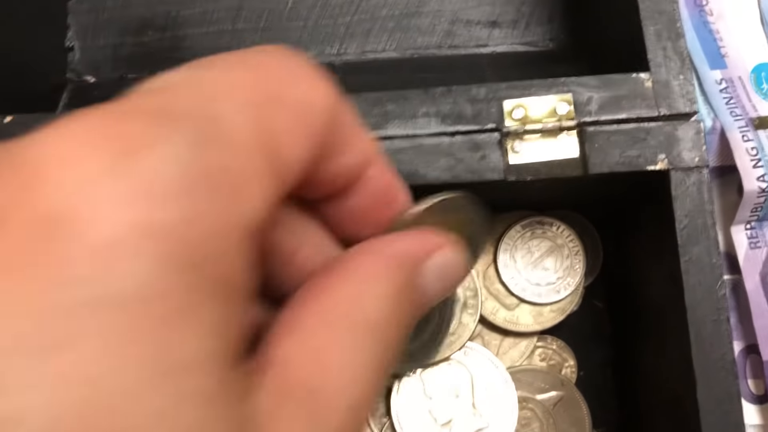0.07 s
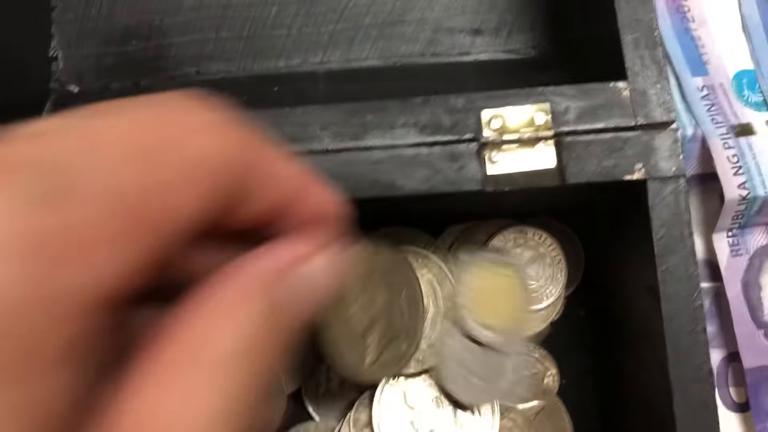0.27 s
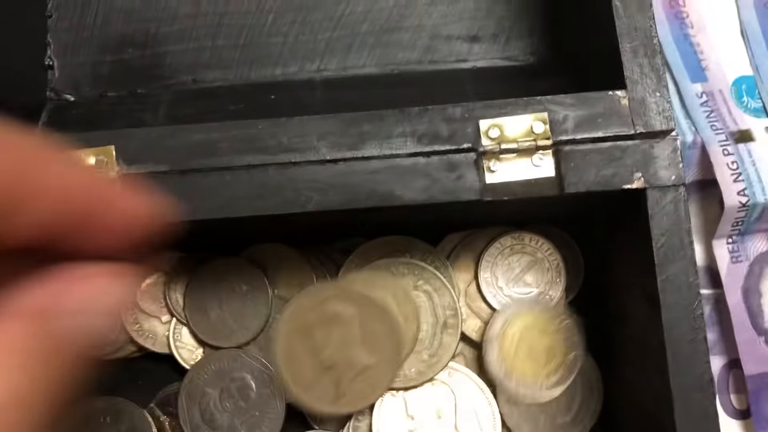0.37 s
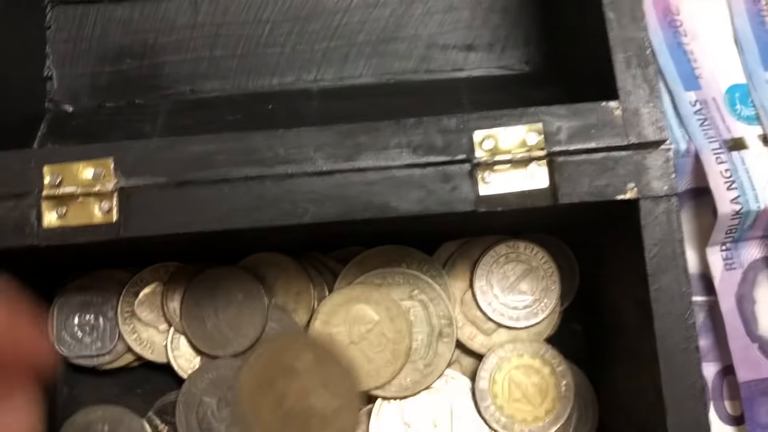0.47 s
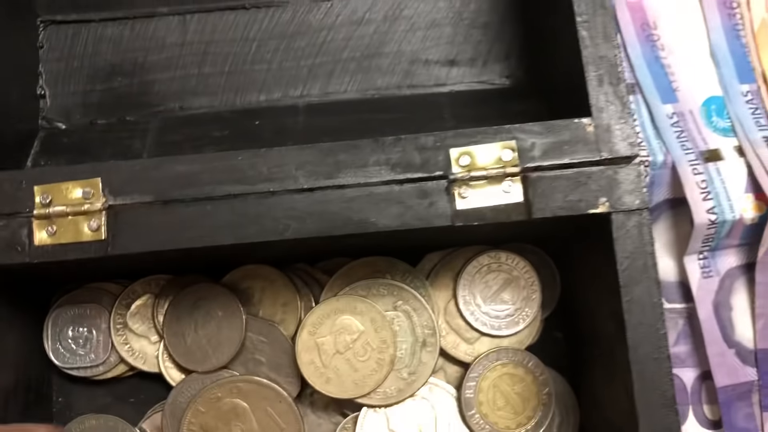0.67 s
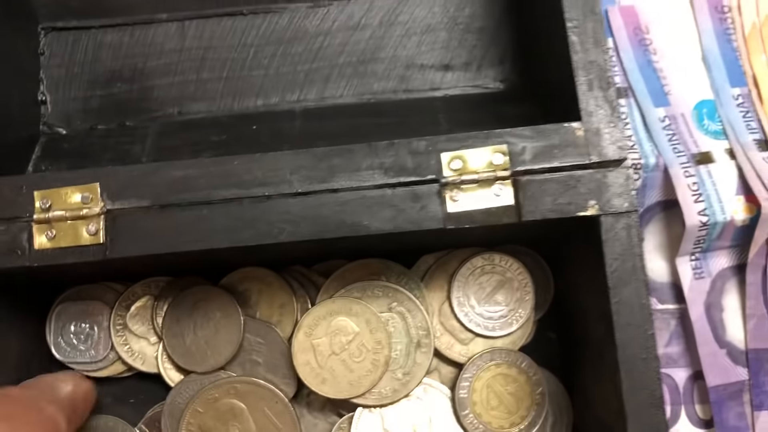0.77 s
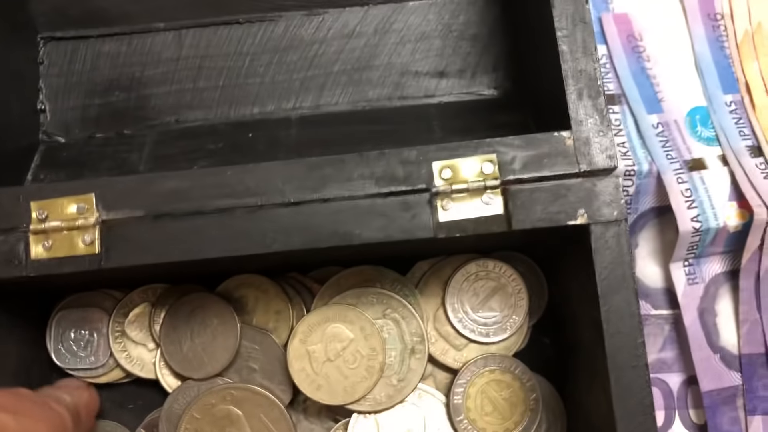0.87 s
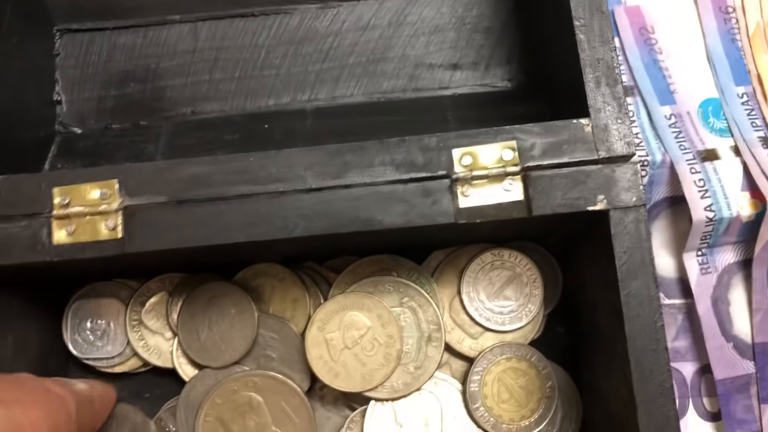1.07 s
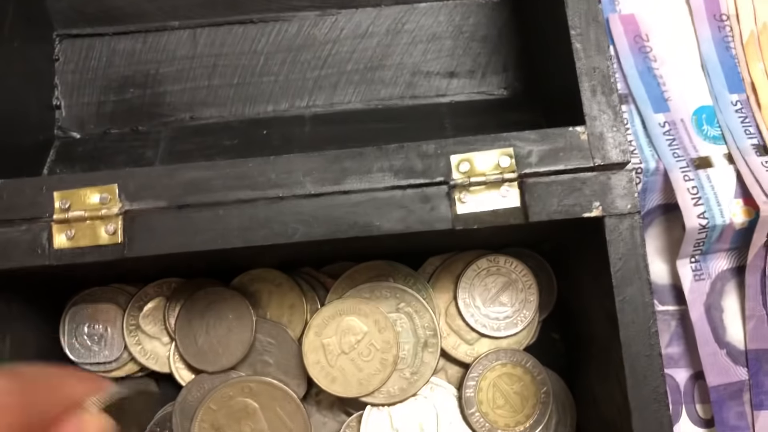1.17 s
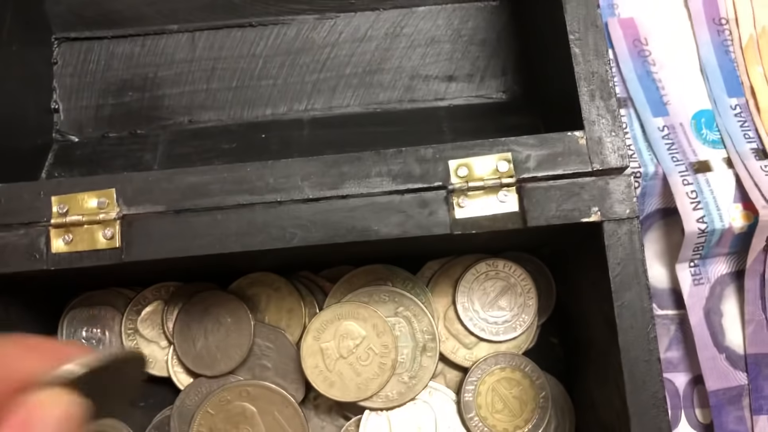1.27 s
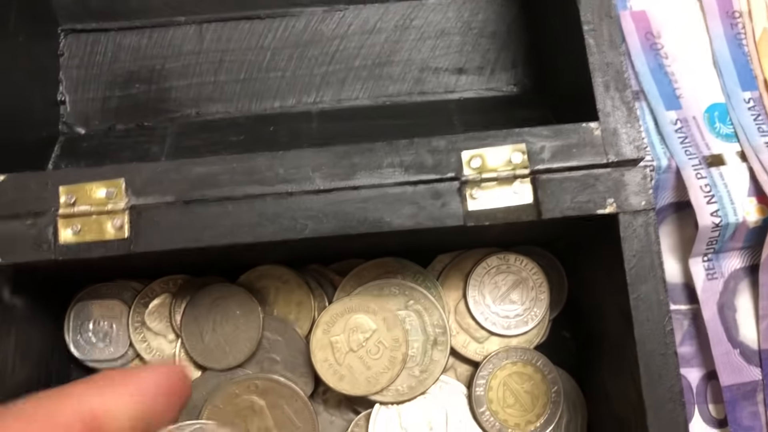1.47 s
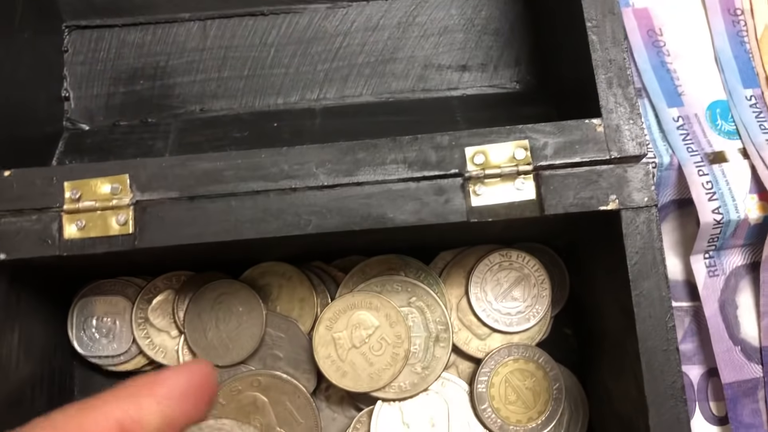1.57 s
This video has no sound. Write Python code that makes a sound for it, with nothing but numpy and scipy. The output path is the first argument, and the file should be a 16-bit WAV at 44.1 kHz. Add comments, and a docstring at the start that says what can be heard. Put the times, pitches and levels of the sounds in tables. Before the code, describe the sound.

Coins clink in a small wooden box, close by in a quiet room. A few light ticks come first. From about 0.2 to 0.7 seconds, coins tumble onto the pile in a dense, bright jingle with brief ringing and soft wooden knocks. After a lull, scattered clicks come around 0.9 seconds. From 1.2 seconds a finger pushes the coins in a short, scraping clatter that fades by 1.5 seconds.

```python
"""Quiet room, small wooden box: a hand drops a few coins on a pile, then a finger pushes them about.
Each contact gives a bright metal tick, a clack of the pile and a knock of the wood below.
Free coins ring briefly on beating mode pairs; sliding rims scrape and set small coins shimmering.
Behind that: a soft opening rub, low thuds of the box, wall and room reflections, still air."""
import sys
import numpy as np
from scipy import signal
from scipy.fft import rfft, irfft
from scipy.io import wavfile
from scipy.ndimage import uniform_filter1d

SR = 44100
rng = np.random.default_rng(int(sys.argv[2]) if len(sys.argv) > 2 else 0)


def put_to_file(sound):
    """Save the sound as 16-bit audio at rate SR, in the file named by the first command-line argument."""
    columns = np.atleast_2d(sound).T  # one column per channel
    safe = np.clip(columns, -1, 1)
    whole_steps = np.round(safe * 32767)
    wavfile.write(sys.argv[1], SR, whole_steps.astype(np.int16))


N = 70560

# (time [s], relative knock [dB], relative clack [dB], relative tick [dB], tick centre [Hz])
CONTACTS = [(0.025, -56.5, -74, -38.5, 9100), (0.033, -65, -47, -27, 10000),
            (0.0404, -46.5, -74, -35, 10600), (0.0592, -49, -47.5, -32, 10300),
            (0.0877, -52, -53, -31, 12500), (0.1014, -83, -73, -28, 11900), (0.2013, -39, -46, -55, 9000),
            (0.2034, -30.5, -26, -23.5, 10300), (0.2103, -67, -58, -43, 12000),
            (0.223, -68, -49, -44, 11400), (0.2298, -40, -29, -28, 11800), (0.2548, -70, -36, -32, 11800),
            (0.2645, -55, -35, -36, 11300), (0.288, -47, -37, -26.5, 10600), (0.3011, -64, -36, -22, 11100),
            (0.3102, -33, -39, -34, 11800), (0.3248, -60, -32.5, -24.5, 8700),
            (0.335, -66, -39, -35, 12200), (0.3479, -62, -32, -26.5, 12500),
            (0.3671, -61, -31.5, -26, 12700), (0.3722, -31.5, -25.5, -38, 12800),
            (0.3878, -68, -28.5, -25, 12700), (0.3992, -30, -25, -26, 12400),
            (0.4023, -46, -31, -41, 11600), (0.4237, -36, -28.5, -40, 11400),
            (0.4358, -31, -33, -24, 12800), (0.4473, -34.5, -29, -30, 11800),
            (0.4536, -33, -27.5, -43, 12400), (0.4717, -37.5, -33, -29, 10300),
            (0.4772, -33, -28.5, -24.5, 11930), (0.4922, -35, -29.5, -28, 14100),
            (0.5081, -37, -30, -37, 9600), (0.5109, -32.5, -26, -30.5, 11080),
            (0.5237, -31.5, -28.5, -22, 11600), (0.528, -50.5, -36, -22, 11040),
            (0.533, -36, -26, -25.5, 12100), (0.5655, -36, -39.5, -37, 12300),
            (0.586, -36, -31.5, -26.5, 11900), (0.6031, -40.5, -34, -33, 11600),
            (0.631, -34, -31, -23, 11800), (0.6351, -38, -29, -27.5, 12400),
            (0.648, -34.5, -26.5, -34.5, 11500), (0.6513, -35.5, -34, -29, 10400),
            (0.6573, -53, -29.5, -37, 10600), (0.6699, -45, -33.5, -32.5, 9250),
            (0.6756, -38, -35, -34, 9500), (0.682, -48, -32, -33, 8800), (0.713, -53, -43, -64, 8600),
            (0.7214, -41.5, -36, -35, 10900), (0.8281, -55.5, -62, -45, 5100),
            (0.8313, -60, -47, -62, 7000), (0.846, -45.5, -50.5, -47.5, 8400),
            (0.896, -53.5, -39.5, -46, 8300), (0.913, -51, -38, -54, 8500), (0.9203, -50, -45.5, -52, 7300),
            (0.931, -62, -37, -42, 8200), (0.9347, -39, -35.5, -41, 9000), (0.9388, -41.5, -29, -33, 9100),
            (0.952, -35.5, -25.5, -27.5, 10800), (0.9983, -60, -50, -69.5, 7860),
            (1.024, -54, -46, -45, 8150), (1.0373, -50.5, -30.5, -34.5, 9200),
            (1.06, -51.5, -49.5, -45.5, 9450), (1.1308, -55.5, -45, -61.5, 6600),
            (1.1644, -37, -31.5, -27, 7500), (1.18, -55, -40.5, -54, 8800),
            (1.2146, -38.5, -31.5, -30, 13100), (1.2269, -40.5, -29, -32.5, 13200),
            (1.2329, -40, -33, -33, 10500), (1.236, -54, -36, -44.5, 9400),
            (1.2513, -44, -35, -52.5, 10100), (1.258, -44.5, -33, -46, 9900),
            (1.261, -55.5, -38, -35, 12600), (1.2713, -44, -44, -31, 12800),
            (1.2737, -36.5, -27.5, -37.5, 14000), (1.289, -50.5, -34.5, -48, 13200),
            (1.3036, -49.5, -37, -40.5, 10200), (1.3094, -49, -31.5, -32.5, 11600),
            (1.3336, -43, -34, -38.5, 12900), (1.3425, -56, -47, -37, 9260),
            (1.3798, -46, -34.5, -38.5, 13420), (1.3919, -51, -43, -41.5, 11540),
            (1.4196, -53, -43.5, -51.5, 10200), (1.4375, -61.5, -50.5, -75, 8500)]
# free coins, and the floor under one soft touch: (time [s], mode name, level [dB], t60 [s])
RINGS = [(0.2023, "h", -30, 0.35), (.2037, "k", -23, 0.058), (.212, "i", -30, 0.072),
         (0.2287, "i", -17.5, 0.097), (.2524, "d", -45, 0.38), (0.264, "h", -19, 0.036),
         (0.303, "i", -21.5, .08), (.3015, "n", -34, 0.15), (0.309, "h", -26, 0.24),
         (.317, "e", -31.5, 0.4), (0.3382, "j", -23, 0.24), (0.3702, "i", -22, 0.14),
         (0.3723, "f", -30, .14), (.3725, "m", -23, 0.21), (0.4014, "g", -21, 0.23),
         (0.416, "k", -29, 0.14), (.4363, "l", -26.5, .1), (.459, "d", -31, 0.1), (.4769, "h", -26, 0.067),
         (0.4907, "l", -19.5, 0.04), (.4927, "n", -24, 0.05), (.5087, "a", -31.5, 0.12),
         (0.5256, "h", -26, 0.05), (.585, "l", -31, 0.098), (.631, "n", -30.5, 0.1),
         (0.7218, "b", -43.5, 0.12), (0.722, "h", -47, 0.13), (.9525, "o", -23.5, 0.017),
         (1.1647, "o", -22, 0.024), (1.1647, "a", -22, 0.019), (.845, "floor", -40.5, 0.027),
         (1.2144, "n", -31.5, 0.23), (1.2146, "a", -41, 0.089), (1.256, "c", -32, 0.2),
         (1.263, "l", -27, 0.11), (1.274, "l", -22.5, 0.068)]
# modes of single coins and the box floor: (mode name, frequency [Hz])
MODE_HZ = dict(a=6425, b=8180, c=8564, d=9238, e=10568, f=11030, g=11365, h=11450, i=12447, j=12640, k=13800, l=13895, m=14346, n=14852, o=15300, floor=1100)
# coin-on-coin sliding curve: (time [s], level [dB])
SLIDING = [(0, -55.5), (.08, -62.5), (0.195, -60.5), (0.217, -36), (.28, -43.5), (.32, -37.5), (.44, -36),
           (.53, -42.5), (.57, -39.5), (.66, -41), (.72, -48), (.77, -65), (.84, -50.5), (.88, -67.5),
           (.96, -57), (1.1, -57.5), (1.205, -52.5), (1.22, -38), (1.245, -41.5), (1.275, -34.5),
           (1.32, -43.5), (1.37, -53.5), (1.441, -79), (1.47, -107.5)]
# floor under the pushed stack, then the stack itself: (frequency [Hz], relative level [dB], t60 [s])
STACK_MODES = [(576, -17, 0.035), (2836, 0.5, 0.015), (3100, 6, 0.014), (3470, -7, 0.017)]
# tones woken by the rub: (frequency [Hz], level [dB], t60 [s])
RUB_MODES = [(1250, -64.5, 0.094), (2046, -60, 0.59), (3120, -63.5, 0.12)]
# jogs of the box: (time [s], level [dB])
JOGS = [(0.069, -64.5), (.215, -63), (.345, -60), (0.411, -60.5), (1.285, -71.5)]

# spectra: (frequency [Hz], relative density [dB])
PILE_SPECTRUM = [(1200, -28.5), (2200, -4), (2750, -1), (3120, 2.5), (3600, -0.5), (4600, -5.5),
                 (6000, -8.5), (10000, -14)]
WOOD_SPECTRUM = [(130, -13), (280, -6), (430, -13), (700, -6), (980, 0.5), (1500, -0.5), (2000, 3.5),
                 (2800, -12), (5000, -32.5)]
DULL_SCRAPE_SPECTRUM = [(150, -14), (290, -4), (430, -23.5), (680, -9.5), (1100, -2), (2500, -4.5),
                        (3100, 6), (4200, 0.5), (12000, -31.5)]
BRIGHT_SCRAPE_SPECTRUM = [(3000, -42), (7000, 9.5), (12000, -1), (16000, 0.5)]
RUB_SPECTRUM = [(200, -3.5), (550, 3.5), (1280, -0.5), (1650, -13), (8000, -16)]
JOG_SPECTRUM = [(25, -13.5), (65, 3.5), (130, 4.5), (280, -25), (900, -37.5)]
ECHO_SPECTRUM = [(1000, 4.5), (3500, 1), (8000, -1.5), (16000, -4.5)]
AIR_SPECTRUM = [(20, -27), (60, -5.5), (700, -12), (1500, -25), (16000, -28.5)]

CONTACT_RISE_S, CONTACT_S, RING_RISE_S = 0.00042, 0.0021, 0.00028
METAL_LOW_HZ, WOOD_LOW_HZ, EDGE_HZ = 737, 213, 16000
TICK_TRIM_DB, CLACK_TRIM_DB, KNOCK_TRIM_DB = -1, -0.5, -2.5
TICK_WIDTH_OCT, TICK_SKIRT_DB, TICK_RIPPLE_DB, TICK_RIPPLE_HZ = 0.57, -33, 2, 398.4
TICK_BASE_T60_S, LOOSE_DB_PER_DB, LOOSE_PIVOT_DB = 0.014, 0.42, -46.5
TWIN_SPLIT_HZ, TWIN_DB, RATTLE_HZ, RATTLE_DEPTH = 68, -11, 240, 0.45
BRIGHT_DB_PER_DB, BRIGHT_PIVOT_DB = 1.71, -40
SHIMMER_DB, STACK_TAP_DB, STACK_SLIDE_DB = -4, -1, -9.5
PUSH_START_S, PUSH_CLACK_DB, PUSH_SHIMMER_DB, PUSH_LOW_HZ = 0.94, -2.5, -12.5, 383.5


def contacts(size=4096):
    """Each contact sounds metal, pile and wooden floor at once."""
    metal, wood = np.zeros(N), np.zeros(N)
    freq_hz = np.fft.rfftfreq(size, 1 / SR) + 1
    for time_s, knock_db, clack_db, tick_db, tick_hz in CONTACTS:
        tick = metal_tick(time_s, tick_hz, freq_hz, size)
        clack = choked_modes(spectrum_db(PILE_SPECTRUM, freq_hz), t60_s=0.017)
        knock = choked_modes(spectrum_db(WOOD_SPECTRUM, freq_hz), t60_s=0.019)
        if time_s > PUSH_START_S:  # finger nudges a stack: light taps, little floor
            clack = amp(PUSH_CLACK_DB) * clack + amp(STACK_TAP_DB) * stack(size)
            knock = highpass(knock, PUSH_LOW_HZ)
        add(metal, time_s, amp(tick_db + TICK_TRIM_DB) * tick + amp(clack_db + CLACK_TRIM_DB) * clack)
        add(wood, time_s, amp(knock_db + KNOCK_TRIM_DB) * knock)
    return highpass(metal, METAL_LOW_HZ) + highpass(wood, WOOD_LOW_HZ)


def metal_tick(time_s, centre_hz, freq_hz, size):
    """Each coin pair has its own peaks and gaps; a sliding pile lies looser and ticks longer."""
    octaves = np.log2(freq_hz / centre_hz)
    band = np.exp(-0.5 * (octaves / TICK_WIDTH_OCT) ** 2) * (freq_hz < EDGE_HZ) + amp(TICK_SKIRT_DB)
    ripple_db = TICK_RIPPLE_DB * smooth_noise(len(freq_hz), TICK_RIPPLE_HZ * size / SR)
    looseness = amp(LOOSE_DB_PER_DB * (sliding_db(time_s) - LOOSE_PIVOT_DB))
    return choked_modes(20 * np.log10(band) + ripple_db, TICK_BASE_T60_S * looseness)


def choked_modes(shape_db, t60_s, even_hz=536):
    """Dense modes choked by the pile; a short blow drives those within even_hz alike."""
    size = 2 * (len(shape_db) - 1)
    burst = rfft(rng.standard_normal(size) * struck(CONTACT_RISE_S, t60_s, size))
    power = uniform_filter1d(abs(burst) ** 2, int(even_hz * size / SR))
    log_gain = np.log(amp(shape_db) / np.sqrt(power))
    mirrored = np.r_[log_gain, log_gain[-2:0:-1]]
    min_phase = np.exp(np.conj(signal.hilbert(mirrored))[:len(shape_db)])
    sound = irfft(burst * min_phase)
    return sound / np.sqrt(np.mean(sound[:int(CONTACT_S * SR)] ** 2))


def rings(size=16384):
    """A stamped disc beats with a weaker twin mode and trembles against the coins that damp it."""
    out, t = np.zeros(N), np.arange(size) / SR
    for time_s, mode, db, t60_s in RINGS:
        hz = MODE_HZ[mode]
        phase, twin_phase, split = rng.random(3)
        twin_hz = hz + TWIN_SPLIT_HZ * (split + 0.5) * rng.choice([-1, 1])
        pair = np.exp(2j * np.pi * (hz * t + phase))
        pair += amp(TWIN_DB) * np.exp(2j * np.pi * (twin_hz * t + twin_phase))
        sway, drift = smooth_noise(size, SR / RATTLE_HZ), smooth_noise(size, SR / RATTLE_HZ)
        tremble = (1 + RATTLE_DEPTH * (sway + 1j * drift) / np.sqrt(2)) / np.hypot(1, RATTLE_DEPTH)
        add(out, time_s, amp(db) * (pair * tremble).real * struck(RING_RISE_S, t60_s, size))
    return highpass(out, METAL_LOW_HZ)


def scrapes():
    """Rims and faces catch: a dull shuffle, brighter when pushed hard, that sets coins ringing."""
    t = np.arange(N) / SR
    slide_db, pushed = sliding_db(t), t > PUSH_START_S
    bright_db = BRIGHT_PIVOT_DB + BRIGHT_DB_PER_DB * (slide_db - BRIGHT_PIVOT_DB)
    shuffle = grains(DULL_SCRAPE_SPECTRUM, slide_db) + grains(BRIGHT_SCRAPE_SPECTRUM, bright_db)
    shimmer = patter(small_coin, bright_db + SHIMMER_DB + PUSH_SHIMMER_DB * pushed, rate_per_s=250)
    chatter = pushed * patter(stack, slide_db + STACK_SLIDE_DB, rate_per_s=220)
    return shuffle / np.sqrt(2) + highpass(shimmer + chatter, METAL_LOW_HZ)


def grains(spectrum, db, size=1024):
    """Dry ticks of one colour."""
    envelope = struck(CONTACT_RISE_S, t60_s=0.0066, size=size)
    ticks = patter(lambda: noise(spectrum, size) * envelope, db, rate_per_s=620)
    return highpass(ticks, WOOD_LOW_HZ)


def stack(size=4096, spread=0.063):
    """The stack rings near one pitch, slightly shifted at each touch."""
    shift = 1 + spread * (rng.random() - 0.5)
    return sum(amp(db) * ping(hz * shift, t60_s, size) for hz, db, t60_s in STACK_MODES)


def small_coin():
    """One high partial of a small coin in the pile."""
    return ping(hz=rng.uniform(10500, 15400), t60_s=0.055, size=8192)


def rub(length_s=0.1, level_db=-54.5):
    """Fingers rub on a coin: a soft swell with faint lingering tones."""
    out, size = np.zeros(N), int(length_s * SR)
    swell = np.sin(np.linspace(0, np.pi, size))
    add(out, 0, amp(level_db) * noise(RUB_SPECTRUM, size) * swell)
    for hz, db, t60_s in RUB_MODES:
        mode = ping(hz, t60_s, N)
        friction = rng.standard_normal(size) * swell
        add(out, 0, amp(db) * signal.fftconvolve(friction, mode / np.linalg.norm(mode)))
    return out


def jogs(size=16384):
    """Hand and falling coins jog the box on the table: soft low thuds."""
    out = np.zeros(N)
    envelope = struck(rise_s=0.0019, t60_s=0.2, size=size)
    for time_s, db in JOGS:
        add(out, time_s, amp(db) * noise(JOG_SPECTRUM, size) * envelope)
    return out


def echo(x, rise_s, t60_s, size=24000):
    """Dense reflections that swell and decay."""
    tail = noise(ECHO_SPECTRUM, size) * struck(rise_s, t60_s, size)
    return signal.fftconvolve(x, tail / np.linalg.norm(tail))[:N]


def air(level_db=-75.5):
    """Still room air: faint low noise."""
    return amp(level_db) * noise(AIR_SPECTRUM, N)


def patter(strike, db, rate_per_s, spread_db=3, variants=40):
    """Tiny blows of random time and size along the level curve db."""
    strength = amp(spread_db * np.minimum(rng.exponential(1, N), 4))
    hits = rng.random(N) < rate_per_s / SR
    blows = amp(db) * unit_rms(strength * hits)
    variant, out = rng.integers(0, variants, N), np.zeros(N)
    for k in range(variants):
        sound = strike()
        out += signal.oaconvolve(blows * (variant == k), sound / np.linalg.norm(sound))[:N]
    return out


def ping(hz, t60_s, size):
    """One struck mode."""
    cycles = hz * np.arange(size) / SR + rng.random()
    return np.sin(2 * np.pi * cycles) * struck(RING_RISE_S, t60_s, size)


def struck(rise_s, t60_s, size):
    """Blow envelope: quick rise, exponential decay."""
    t = np.arange(size) / SR
    return (1 - np.exp(-t / rise_s)) * np.exp(-np.log(1000) * t / t60_s)


def noise(spectrum, size):
    """Coloured noise, rms 1."""
    gain = amp(spectrum_db(spectrum, np.fft.rfftfreq(size, 1 / SR)))
    return unit_rms(irfft(rfft(rng.standard_normal(size)) * gain, size))


def smooth_noise(size, width):
    """Noise averaged over width points, rms 1."""
    return unit_rms(uniform_filter1d(rng.standard_normal(size), int(width)))


def highpass(x, hz):
    """Small objects radiate little below hz."""
    return signal.sosfilt(signal.butter(2, hz, "high", fs=SR, output="sos"), x)


def sliding_db(time_s):
    """Sliding level at time_s."""
    return np.interp(time_s, *np.transpose(SLIDING))


def spectrum_db(spectrum, freq_hz):
    """Spectrum interpolated over log frequency."""
    hz, db = np.transpose(spectrum)
    return np.interp(np.log(freq_hz + 1), np.log(hz), db)


def amp(db):
    """Decibels to gain."""
    return 10 ** (np.asarray(db) / 20)


def unit_rms(x):
    """Scale to rms 1."""
    return x / np.sqrt(np.mean(x ** 2) + 1e-20)


def add(mix, time_s, sound):
    """Mix in at time_s."""
    part = mix[max(round(time_s * SR), 0):][:len(sound)]
    part += sound[:len(part)]


def scene():
    """Coins with box and room reflections, over thuds and air; mono."""
    coins = contacts() + rings() + scrapes() + rub()
    box_walls = amp(-13) * echo(coins, rise_s=0.00087, t60_s=0.025)
    room = amp(-22) * echo(coins, rise_s=0.003, t60_s=0.24)
    return (coins + box_walls + room + jogs() + air())[None]


def record(dry):
    """Low-pass at EDGE_HZ."""
    lowpass = signal.firwin(255, EDGE_HZ, window=("kaiser", 8), fs=SR)
    return signal.oaconvolve(dry, lowpass[None], "same")


dry = scene()
out = record(dry)
put_to_file(out)
```